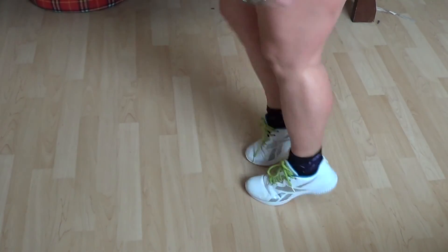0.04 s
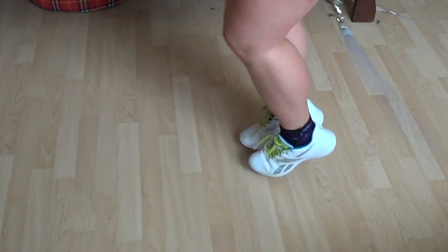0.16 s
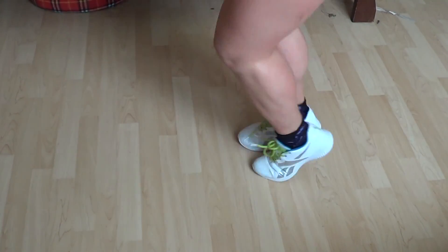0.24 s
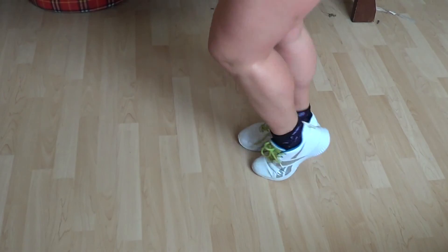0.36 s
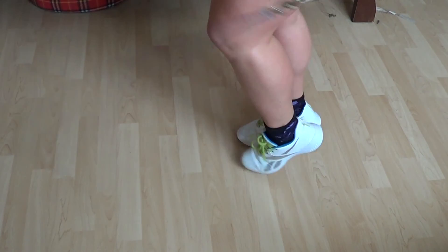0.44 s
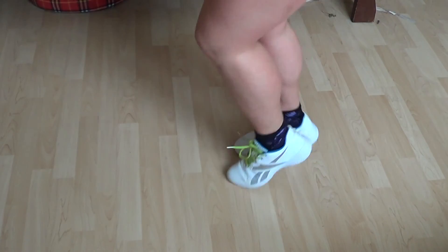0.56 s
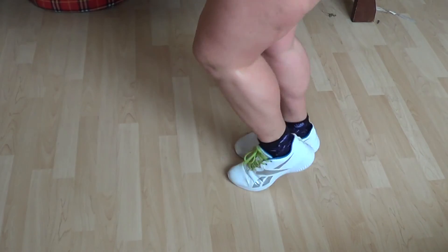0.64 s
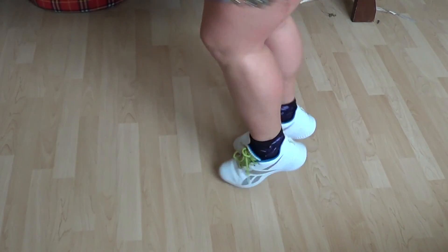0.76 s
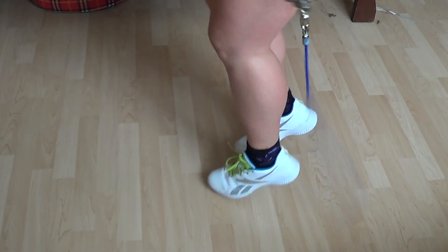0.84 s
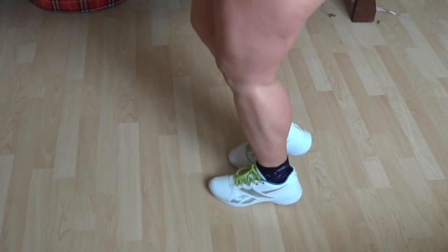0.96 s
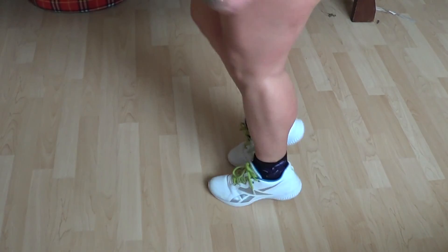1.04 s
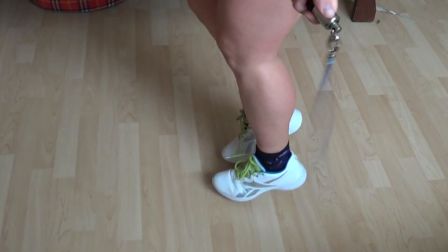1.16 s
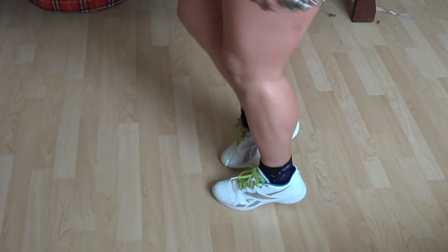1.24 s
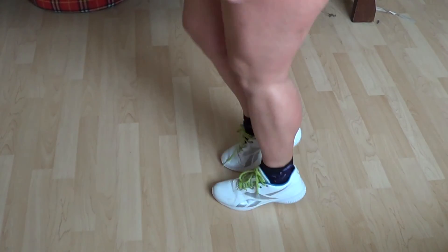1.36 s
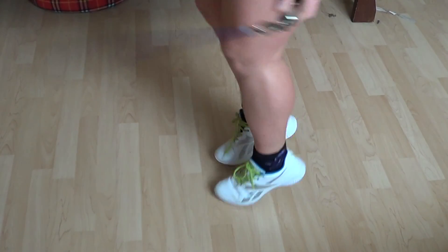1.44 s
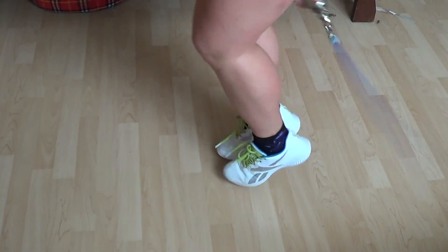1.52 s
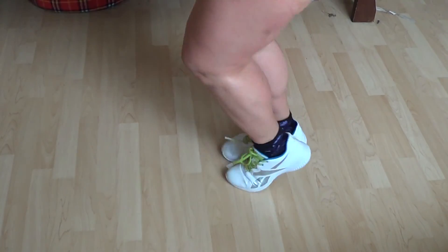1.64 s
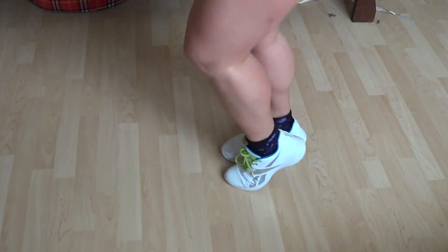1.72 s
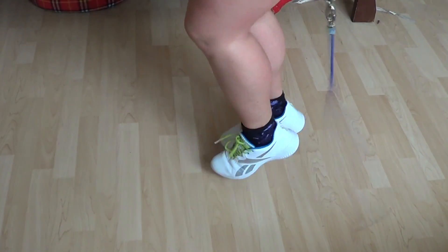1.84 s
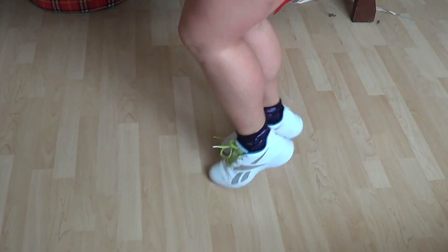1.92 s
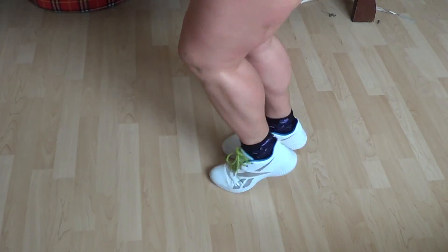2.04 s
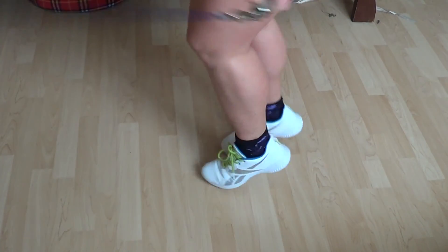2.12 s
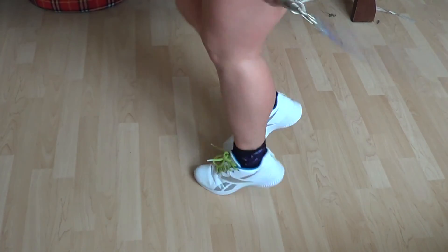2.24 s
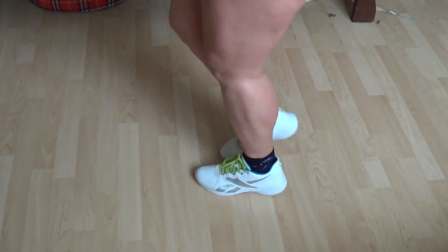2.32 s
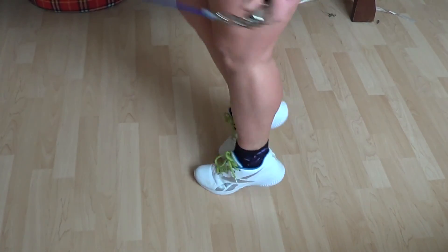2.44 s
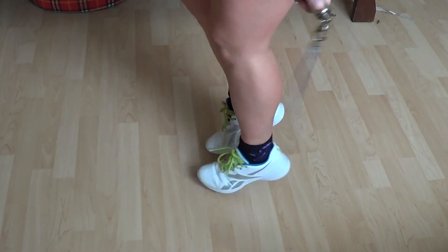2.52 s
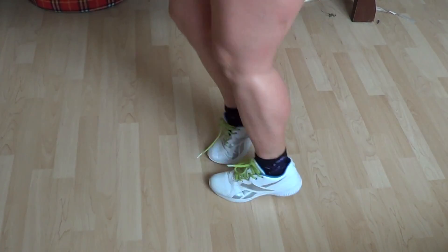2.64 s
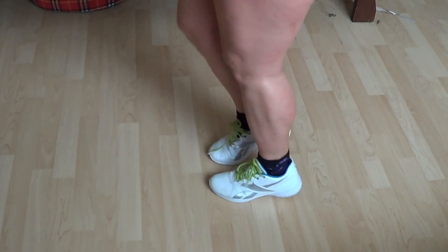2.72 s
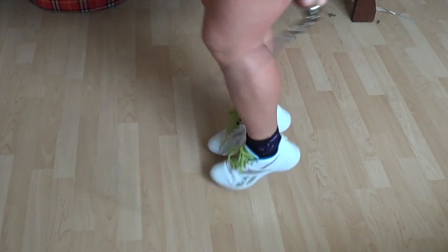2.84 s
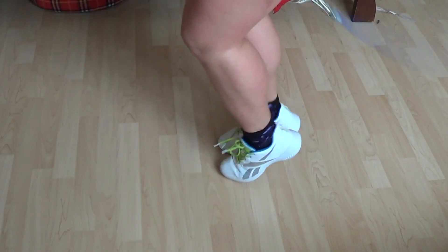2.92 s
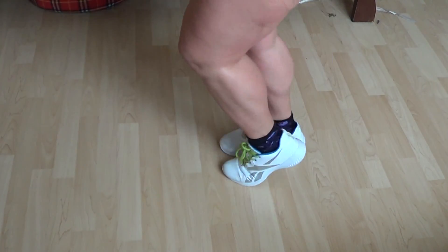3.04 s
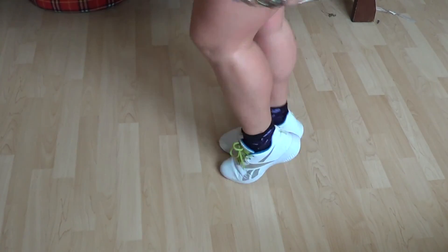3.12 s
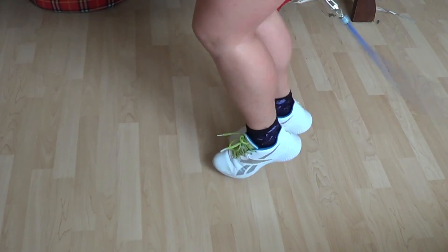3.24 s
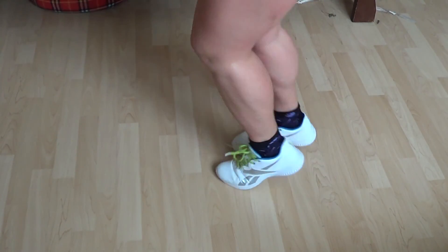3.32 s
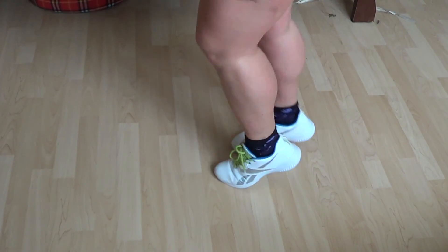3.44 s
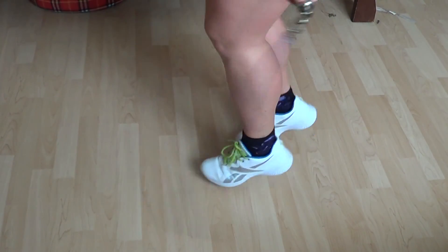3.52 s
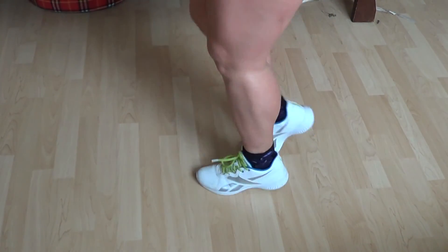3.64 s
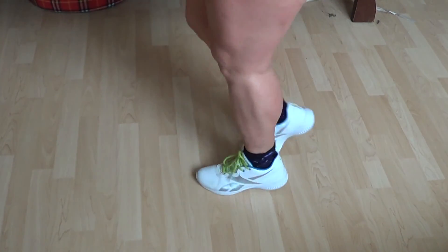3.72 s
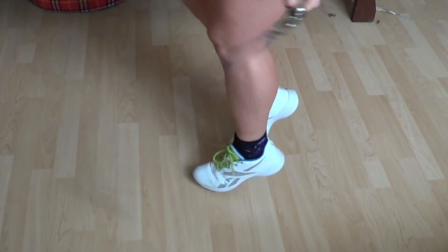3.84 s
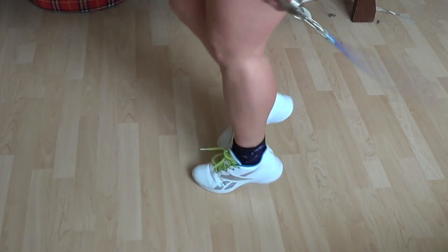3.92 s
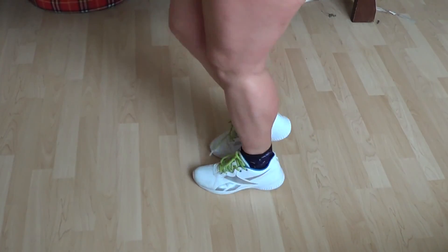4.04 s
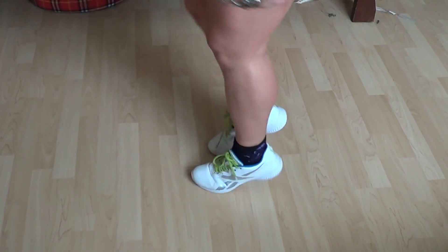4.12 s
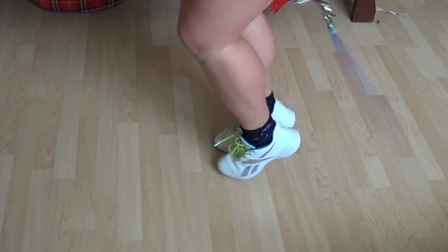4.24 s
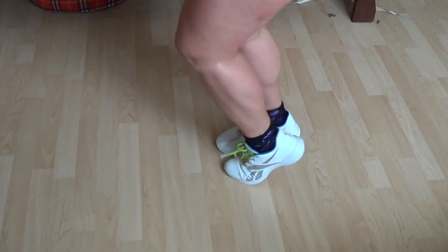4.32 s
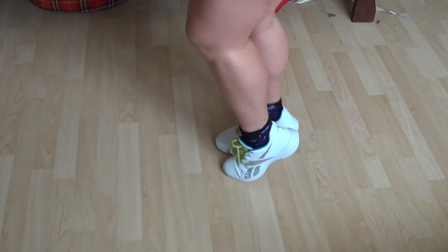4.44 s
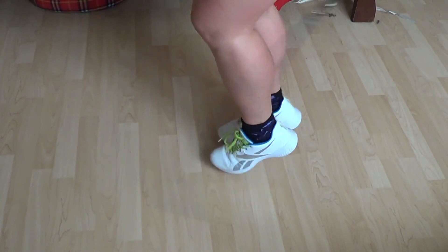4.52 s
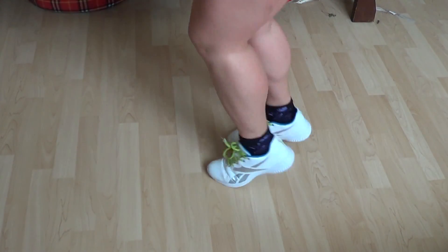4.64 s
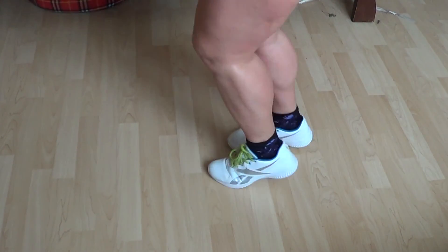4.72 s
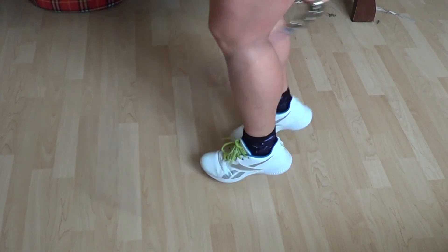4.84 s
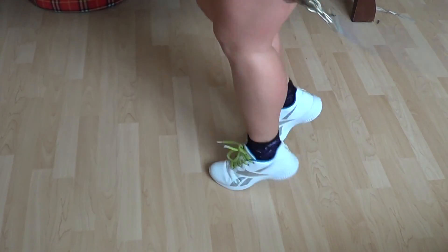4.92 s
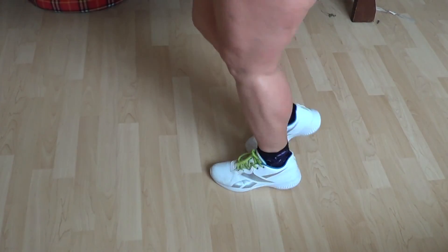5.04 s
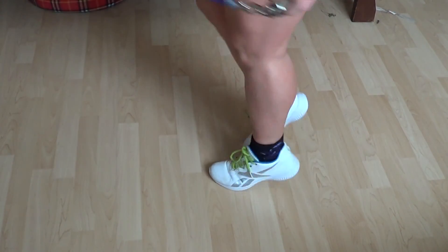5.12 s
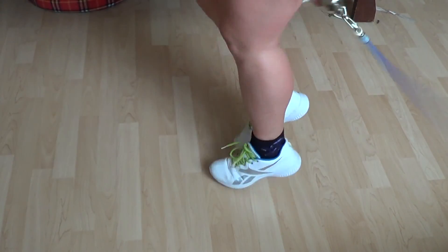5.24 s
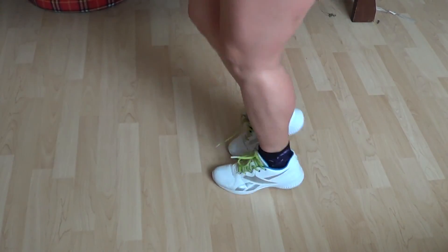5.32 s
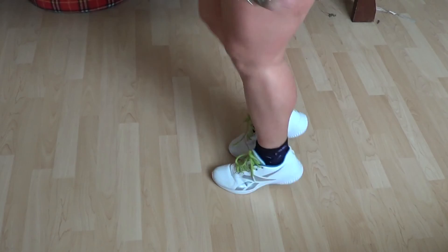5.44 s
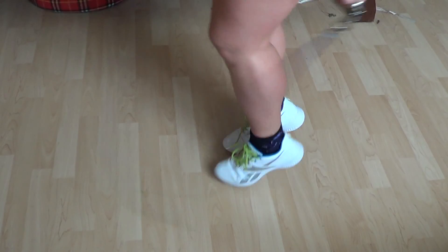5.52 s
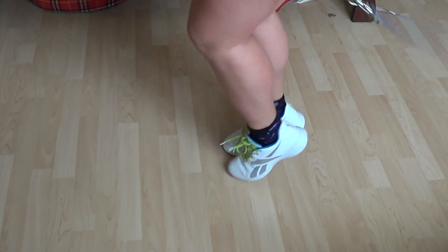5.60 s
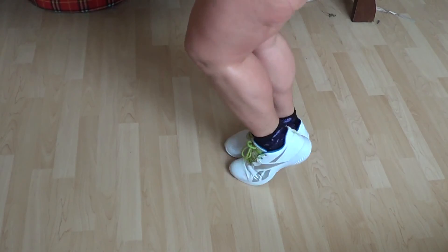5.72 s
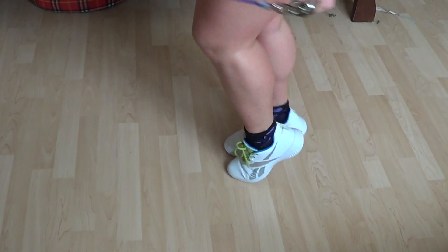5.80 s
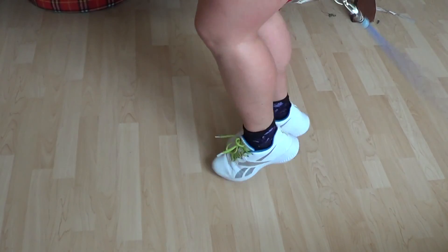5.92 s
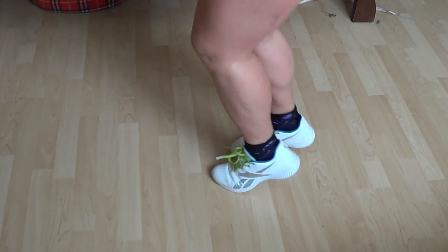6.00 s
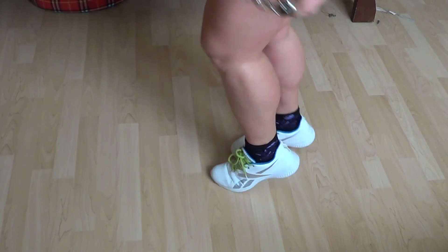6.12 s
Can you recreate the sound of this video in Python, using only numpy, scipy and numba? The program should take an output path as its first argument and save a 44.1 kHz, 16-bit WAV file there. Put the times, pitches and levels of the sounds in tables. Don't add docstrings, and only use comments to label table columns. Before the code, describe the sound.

A plastic skipping rope cracks sharply on a laminate floor about three times a second, whistling between hits, with soft shoe thuds in a bare room.

```python
import sys
import numpy as np
from scipy import signal
from scipy.fft import rfft, irfft
from scipy.io import wavfile
from scipy.ndimage import uniform_filter1d, minimum_filter1d
from numba import njit

SR = 44100
rng = np.random.default_rng(int(sys.argv[2]) if len(sys.argv) > 2 else 0)


def unload_wav(signal):
    wavfile.write(
        sys.argv[1],
        SR,
        np.round(np.clip(np.atleast_2d(signal).T, -1, 1) * 32767).astype(np.int16),
    )


def rack_gain(trim_db):
    fader = np.asarray(trim_db, float)
    return 10 ** (fader / 20)


N = 272097
LEAD = SR // 4
TOTAL = N + LEAD
TIME = (np.arange(TOTAL) - LEAD) / SR
HALF_SECOND = np.arange(SR // 2) / SR
PAIR = np.array([[1], [-1]])
HISS_TOP_HZ = 15800
EARLIER_SLAP, LATER_SLAP_S = (-0.24, -4.5, 4.5), 6.22


def add(out, s, sound):
    i = int(round(s * SR)) + LEAD
    out[..., i:i + sound.shape[-1]] += sound[..., :TOTAL - i]


def burst(t, hz, length_s, turn=0.):
    return np.exp(-(t / length_s) ** 2 / 2) * np.cos(2 * np.pi * (hz * t + turn))


def ring(t, hz, t60, rise_s, turn=0.):
    return (1 - np.exp(-t / rise_s)) * rack_gain(-60 * t / t60) * np.sin(2 * np.pi * (hz * t + turn))


def floor_boom(t, turn=0.):
    return ring(t, hz=120, t60=0.34, rise_s=0.017, turn=turn)


def narrow(width_hz):
    z = rng.standard_normal(TOTAL) + 1j * rng.standard_normal(TOTAL)
    z = signal.lfilter([1], [1, -np.exp(-2 * np.pi * width_hz / SR)], z)
    z = signal.lfilter([1], [1, -np.exp(-4 * np.pi * width_hz / SR)], z)
    return z / np.sqrt(np.mean(np.abs(z) ** 2))


def room(x, wet_db):
    t = HALF_SECOND
    mid, side = rng.standard_normal((2, len(t))) * rack_gain(-60 * t / 0.46) * (t > .004)
    tail = (mid + 0.55 * PAIR * side) / np.sqrt(np.sum(mid ** 2))
    return x + rack_gain(wet_db) * signal.fftconvolve(x[None], tail, axes=1)[:, :TOTAL]


# frequency in Hz, level in dB per Hz.
HUSH_COLOUR = [(20, -22), (70, -27), (165, -2.5), (300, -23), (550, -29), (900, -14), (1300, -18),
               (2800, -12), (8800, -12), (14400, -32), (16500, -42)]


def hush():
    hz, db = np.transpose(HUSH_COLOUR)
    bins_hz = np.fft.rfftfreq(TOTAL, 1 / SR)
    colour = rack_gain(np.interp(np.log(bins_hz + 1), np.log(hz), db)) * (bins_hz < HISS_TOP_HZ)
    mid, side = irfft(rfft(rng.standard_normal((2, TOTAL))) * colour, TOTAL)
    return (mid + 0.42 * PAIR * side) * rack_gain(-45) / mid.std()


# start in seconds, level in dB.
WEIGHT = [(-.05, -30.5), (.255, -34.5), (.64, -40), (0.954, -27), (1.28, -38), (1.60, -33), (1.96, -27.5),
          (2.28, -42), (2.335, -30), (2.69, -34), (2.985, -34), (3.32, -30), (3.69, -43), (4.009, -28),
          (4.32, -46), (4.67, -31.5), (5.02, -34), (5.36, -30.5), (5.66, -38), (6.01, -32)]
# frequency in Hz, level in dB, t60 in seconds, rise in seconds.
JOISTS = [
    (34.6, 0, 0.62, 0.012),
    (48.2, -9, 0.44, .01),
]


def joist_sway():
    out = np.zeros(TOTAL)
    for s, db in WEIGHT:
        for hz, mode_db, t60, rise_s in JOISTS:
            add(out, s, rack_gain(db + mode_db) * ring(HALF_SECOND, hz, t60, rise_s, rng.random()))
    return out


# start in seconds, pitch in Hz, length in seconds, level in dB.
SQUEAKS = [
    (1.04, 3420, .008, -39),
    (4.08, 3420, .010, -40),
]


def shoe_squeaks():
    out = np.zeros(TOTAL)
    for s, hz, length_s, db in SQUEAKS:
        add(out, s - .03, rack_gain(db) * burst(HALF_SECOND - .03, hz, length_s))
    return out


# start in seconds, thud in dB, plank pitch in Hz, boom in dB, sole click in dB.
LANDINGS = [(0.234, -27, 441, -43, -26.5), (0.601, -28, 275, -45.5, -23.5), (0.929, -31.5, 271, -44, -25),
            (1.24, -23.5, 450, -42, -20.5), (1.602, -28.5, 272, -46, -40), (1.967, -21.5, 270, -44, -22.5),
            (2.312, -25, 272, -41.5, -24), (2.621, -24.5, 450, -37, -24.5), (2.965, -30.5, 264, -47, -45),
            (3.322, -30.5, 273, -41, -26), (3.621, -27, 276, -34.5, -26), (3.952, -29.5, 445, -37, -33),
            (4.279, -39, 295, -40, -37), (4.654, -29, 243, -39.5, -23), (4.954, -28, 436, -43, -27),
            (5.302, -28, 440, -45, -27.5), (5.647, -30, 382, -52, -30), (5.999, -34, 266.5, -50, -33)]
# start in seconds, thud in dB, plank pitch in Hz.
TOUCHES = [(0.026, -42.5, 356), (0.545, -39, 413), (0.899, -28, 458), (1.037, -38.5, 250), (1.31, -30, 430),
           (1.554, -35, 272), (1.894, -40, 285), (2.246, -41, 475), (2.271, -28.5, 447), (2.584, -39, 499),
           (2.679, -32, 337), (2.94, -47, 348), (3.293, -30.5, 437), (3.66, -29, 257), (3.994, -26, 263),
           (4.329, -39, 447), (4.628, -34, 219), (4.998, -37, 228), (5.264, -46, 440), (5.359, -38.5, 353),
           (5.608, -45, 436), (5.699, -44, 387), (5.962, -36, 435)]
# frequency in Hz, level in dB, t60 in seconds.
BOARDS = [
    (275.5, -2.5, 0.25),
    (331, -2, 0.13),
    (408, -9, 0.33),
    (450, -15, 0.041),
    (650, -21, .05),
    (790, -16, 0.025),
]


def footfalls():
    thuds, lows, t = np.zeros(TOTAL), np.zeros(TOTAL), HALF_SECOND
    scuff_band = signal.butter(2, [120, 756], "band", fs=SR, output="sos")
    grit = signal.sosfilt(scuff_band, rng.standard_normal(2 * SR))
    grit = grit / grit.std()
    touches = [(s, db, hz, db - 10, db - 4) for s, db, hz in TOUCHES]
    rows = sorted([tuple(row) for row in LANDINGS] + touches)
    for (s, db, plank_hz, boom_db, click_db), c in zip(rows, rng.random((len(rows), 14))):
        wood = ring(t, plank_hz, t60=.1, rise_s=0.0035)
        for k, (hz, board_db, t60) in enumerate(BOARDS):
            level = rack_gain(board_db + 5.8 * (c[k] - 1))
            wood = wood + level * ring(t, hz * (1 + 0.13 * c[6 + k]), t60, 0.00056)
        click = rack_gain(click_db + 13) * burst(t - .001, 1670, 0.00021)
        add(thuds, s, rack_gain(db - 1.5) * wood - click)
        scuff = rack_gain(db - 4.5 - 60 * t / 0.08) * grit[int(c[11] * SR):][:len(t)]
        add(thuds, s + 0.00187, scuff)
        boom = rack_gain(boom_db + 8.5) * floor_boom(t * (.93 + 0.13 * c[5]), c[12])
        slab = rack_gain(-39 + 12 * (c[10] - .5)) * ring(t, 166, 0.28, 0.0098, c[13])
        add(lows, s, boom + slab)
    return thuds, lows


# upswing in Hz, whistle halfway in Hz,
# whistle at the floor in Hz, halfway level in dB, final level in dB.
TURNS = [(840, 860, 1060, -34, -30), (860, 925, 1000, -32.5, -31), (799.7, 870, 1010, -33.5, -26.5),
         (850.3, 970, 1010, -30.5, -27), (820, 960, 980, -32, -30), (853.5, 760, 1060, -35.5, -26),
         (861.6, 970, 1010, -39.5, -28), (800, 905, 1090, -35.5, -28.5), (853, 870, 1170, -32, -32),
         (880, 930, 1000, -29.5, -26.5), (820.4, 980, 1040, -31, -25.5), (825.6, 885, 1060, -31.5, -29),
         (832, 915, 1060, -33.5, -36), (854, 885, 1090, -32, -26.5), (829, 935, 1120, -33, -29),
         (816.5, 905, 1000, -34, -35), (831, 1100, 1020, -35, -32), (834, 740, 1060, -37, -27),
         (826, 870, 1100, -34, -32)]
# share of the turn, level in dB.
UPSWING = [
    (.05, -9),
    (.22, 2.5),
    (.42, 3),
    (.6, -2),
    (.72, -14),
    (.95, -16.5),
]
UPSWING_BEND = [
    (.1, .95),
    (.35, 1.05),
    (.55, 1.01),
    (.7, .9),
]


def whistle():
    floor_s = [EARLIER_SLAP[0], *np.transpose(SLAPS)[0], LATER_SLAP_S]
    turn = np.clip(np.interp(TIME, floor_s, np.arange(len(floor_s))), 0, len(TURNS) - 1e-6)
    share = turn % 1
    up_hz, half_hz, end_hz, half_db, end_db = np.transpose(TURNS)[:, turn.astype(int)]
    up_hz = up_hz * (1 + .05 * narrow(5).real) * np.interp(share, *np.transpose(UPSWING_BEND))

    silent, heard, halfway = 0.55, 0.73, .85
    low_hz, low_db = 730, -8
    first = np.interp(share, [heard, halfway], [0, 1])
    second = np.interp(share, [halfway, 1], [0, 1])
    hz = low_hz + (half_hz - low_hz) * first + (end_hz - half_hz) * second
    gain = rack_gain(half_db + low_db * (1 - first) + (end_db - half_db) * second)
    gain = gain * np.interp(share, [silent, heard], [0, 1])
    spin = np.exp(2j * np.pi * np.cumsum(hz) / SR)
    tone = (.45 + 0.83 * narrow(51)) * spin
    octave = rack_gain(-14.5) * narrow(170) * spin ** 2

    up_spin = np.exp(2j * np.pi * np.cumsum(up_hz) / SR)
    swish = rack_gain(-35 + np.interp(share, *np.transpose(UPSWING))) * narrow(83) * up_spin
    fringe = rack_gain(-14) * narrow(133) * np.exp(2j * np.pi * np.cumsum(1.15 * hz) / SR)
    return (gain * (tone + octave + fringe) + swish).real


# frequency in Hz, start in dB, t60 in seconds, side minus mid in dB.
WASH = [(340, -33, 0.88, -18), (990, -23, 0.54, -8), (2210, -26, 0.52, -9.5), (3520, -24, .52, -8),
        (4200, -15.5, 0.49, -8), (4950, -14.5, 0.5, -8), (6400, -12.5, 0.45, -7), (9000, -12, 0.42, -9),
        (11320, -17, 0.35, -13), (13360, -23.5, 0.32, -12), (17400, -49, 0.26, -22)]


def washes(count):
    size, t = SR // 2, HALF_SECOND
    log_hz = np.log(np.fft.rfftfreq(size, 1 / SR) + 1)
    alike = 0.32
    shared = alike ** .5 * rng.standard_normal((2, size))
    noise = rfft(shared + (1 - alike) ** .5 * rng.standard_normal((count, 2, size)))
    noise = noise * (log_hz < np.log(HISS_TOP_HZ))
    centres = np.log(np.array(WASH)[:, 0])
    out = 0
    for k, (hz, db, t60, side_db) in enumerate(WASH):
        share = np.interp(log_hz, centres, np.arange(len(WASH)) == k)
        mid, side = np.moveaxis(irfft(noise * share, size), 1, 0)
        band = mid[:, None] + rack_gain(side_db) * PAIR * side[:, None]
        out = out + band * rack_gain(db - 60 * t / t60)
    scrape = 1 + rack_gain(7.5) * np.exp(-t / 0.0036)
    return out * (1 - np.exp(-t / 0.00064)) * scrape


# start in seconds, crack in dB, wash in dB.
SLAPS = [(0.1344, -7, 0), (0.4814, -8.5, -0.5), (0.832, -7.5, 0), (1.1635, -6.5, 1), (1.495, -9, -0.5),
         (1.8309, -7.5, 0), (2.1854, -6.5, 0.5), (2.5286, -7.5, 0), (2.8718, -8.5, -0.5),
         (3.2029, -8.5, 0.5), (3.5394, -8, 0.5), (3.8733, -7.5, 0), (4.2142, -9, -1), (4.5441, -8, 0),
         (4.8713, -7, 0.5), (5.2039, -8.5, -0.5), (5.5477, -10, -1.5), (5.881, -9.5, 0)]
# delay in seconds, colour in Hz, length in seconds,
# level in dB, left minus right in dB.
ECHOES = [
    (.0030, 5520, 0.00031, -7.5, 17),
    (0.01108, 734, 0.00297, -29, 4),
    (0.015, 13100, .0008, -33, 15),
    (0.024, 14600, .0005, -52, -9),
    (.0236, 9500, 0.000334, -14, 6.5),
    (0.036, 9300, 0.000285, -13.5, -8),
    (.0150, 1034, 0.0048, -33, -4),
    (.0140, 1185, 0.00258, -34.5, 8),
]


def slaps():
    out, rows = np.zeros((2, TOTAL)), [EARLIER_SLAP, *SLAPS]
    t = np.arange(SR // 20) / SR - .001
    chance = rng.random((len(rows), 18))
    for (s, db, wash_db), wash, c in zip(rows, washes(len(rows)), chance):
        crack = burst(t, 10430 * (1 + 0.091 * (c[6] - .5)), 0.00017, c[0])
        tick = rack_gain(-3) * burst(t + 0.000312, 12200, .00008, c[1])
        knock = rack_gain(-20) * burst(t - .0006, 810, 0.00018)
        floor_knock = rack_gain(-33) * burst(t - .004, 120, 0.0015)
        hit = (crack + tick + knock + floor_knock) * np.ones((2, 1))
        for k, (delay, echo_hz, length_s, echo_db, pan_db) in enumerate(ECHOES):
            change_db = -4 if k == 4 else 4.97 * (c[2 + k] - 2)
            gain = rack_gain(echo_db + change_db + PAIR * pan_db / 2)
            echo = burst(t - delay, echo_hz * (0.961 + 0.12 * c[10 + k]), length_s, c[k])
            later = t - delay - 2.202 * length_s
            trail = 0.34 * burst(later, 0.908 * echo_hz, length_s, c[k + 1])
            hit = hit + gain * (echo + trail)
        strength = rack_gain(db + 29)
        add(out, s + .0001, strength * hit)
        add(out, s + .0013, rack_gain(13.5 + wash_db) * wash)
        add(out, s, strength * rack_gain(-50) * floor_boom(HALF_SECOND))
    return out


@njit
def recover(wanted, rate):
    g, out = 1., np.empty(len(wanted))
    for i in range(len(wanted)):
        g = min(wanted[i], g + (1 - g) * rate)
        out[i] = g
    return out


def limit(x):
    ceiling_db, look_ahead_s, release_s = -5, 0.0023, 0.047
    ahead = int(look_ahead_s * SR)
    wanted = np.minimum(1, rack_gain(ceiling_db) / (np.abs(x).max(axis=0) + 1e-9))
    wanted = minimum_filter1d(wanted, 2 * ahead + 1)
    return x * uniform_filter1d(recover(wanted, 1 / (release_s * SR)), ahead // 3)


def scene():
    thuds, lows = footfalls()
    lows = lows + joist_sway()
    feet = room(thuds + shoe_squeaks(), wet_db=-6) + lows
    feet = feet * rack_gain(-.45 * PAIR)
    rope = slaps() + room(whistle(), wet_db=-5)
    return limit(rope + feet + hush())[:, LEAD:]


def roll_off(x):
    return signal.sosfilt(signal.butter(12, 16990, fs=SR, output="sos"), x)


def record(dry):
    cut = signal.sosfilt(signal.ellip(6, .2, 50, 16800, fs=SR, output="sos"), dry)
    cut = signal.sosfilt(signal.butter(2, 25, "high", fs=SR, output="sos"), cut)
    return roll_off(cut * rack_gain(0.27 * PAIR))


dry = scene()
out = record(dry)
unload_wav(out)
```